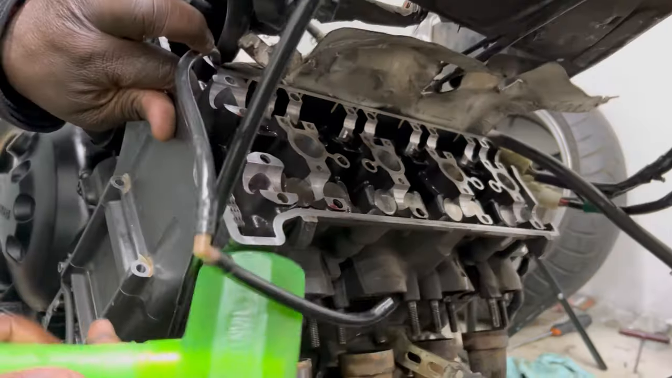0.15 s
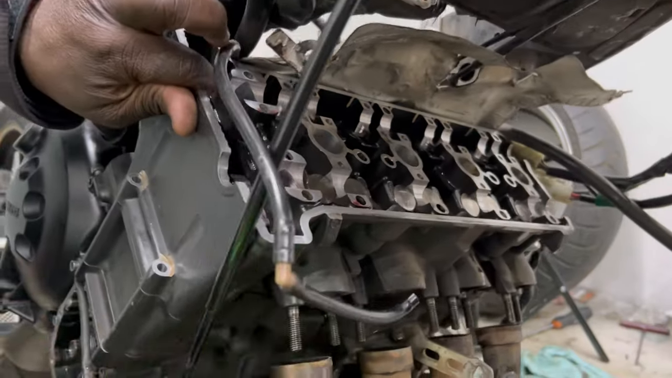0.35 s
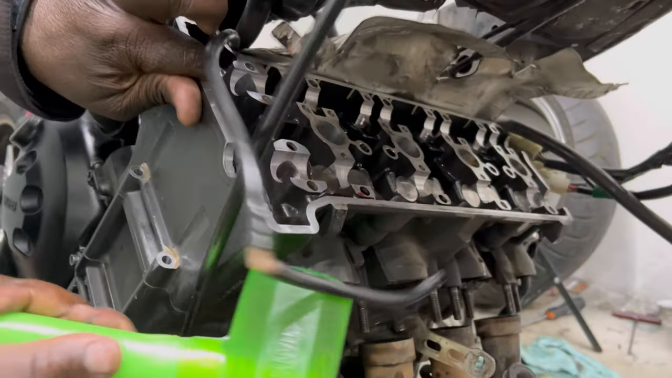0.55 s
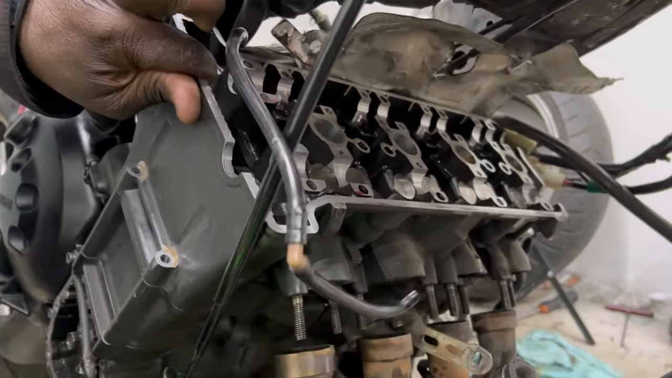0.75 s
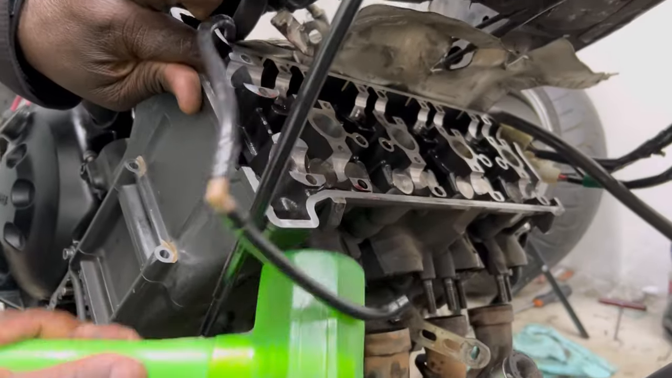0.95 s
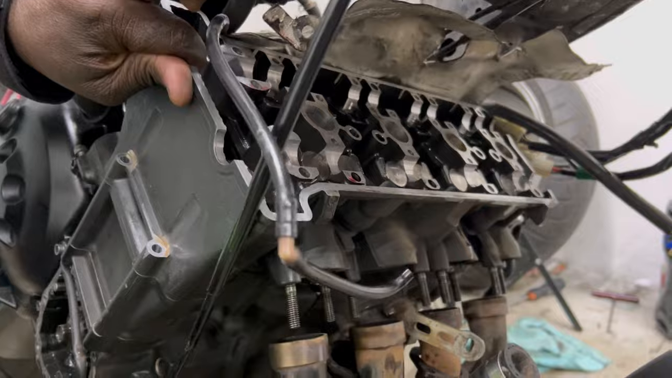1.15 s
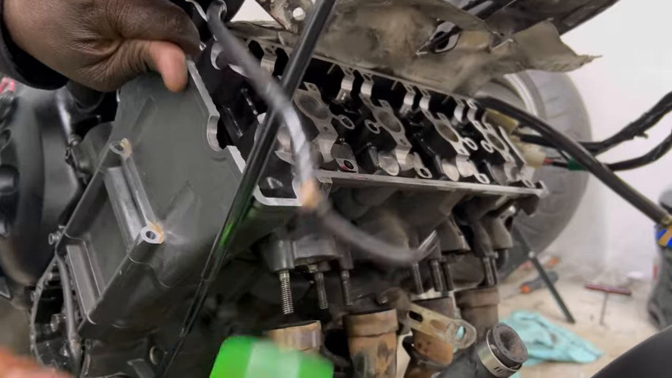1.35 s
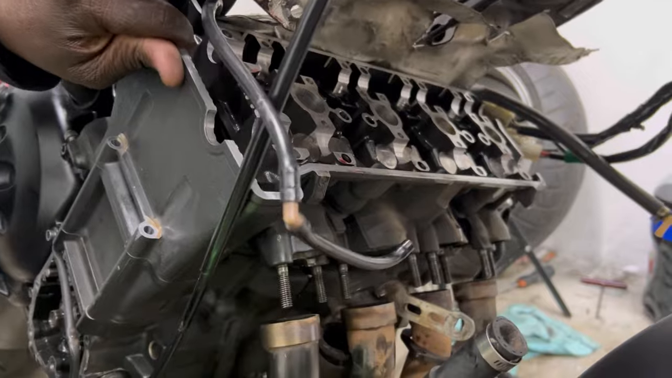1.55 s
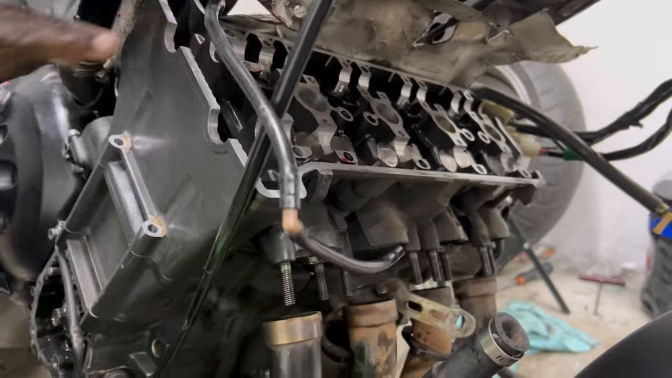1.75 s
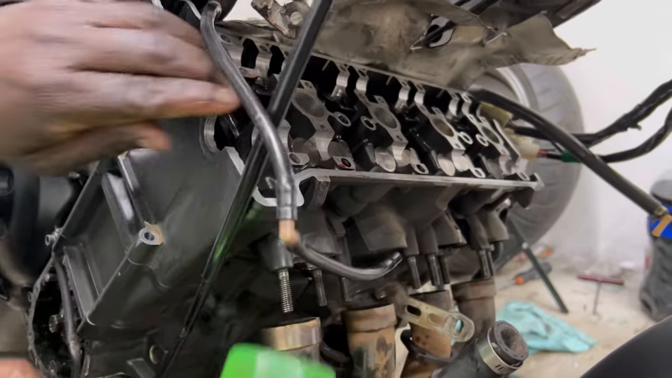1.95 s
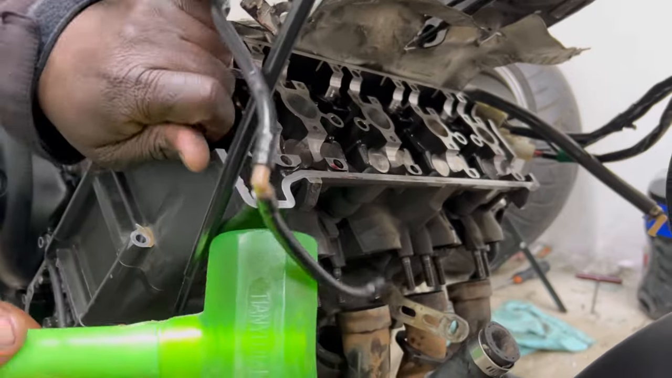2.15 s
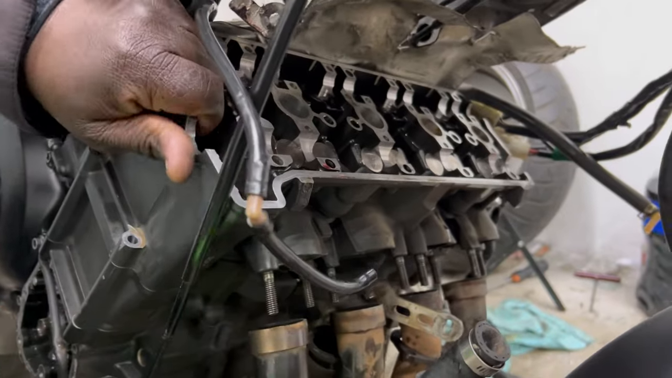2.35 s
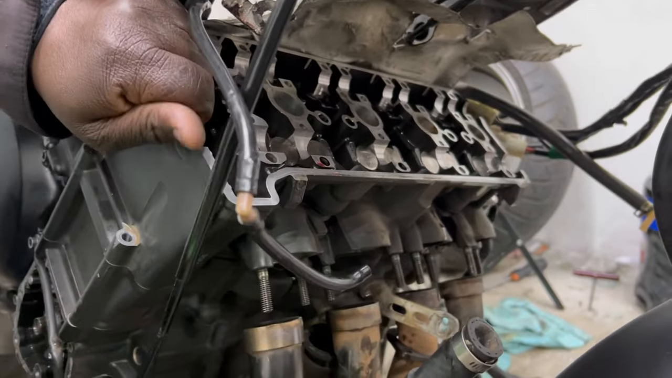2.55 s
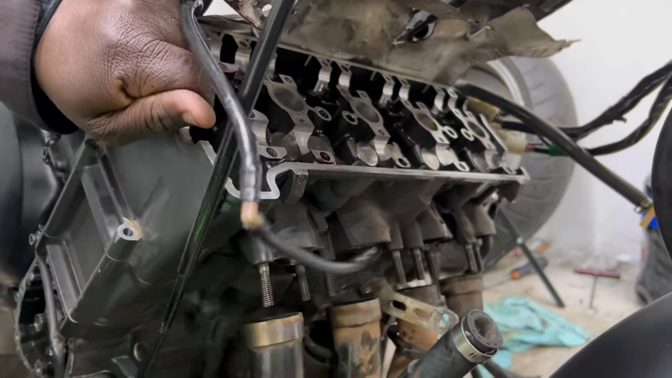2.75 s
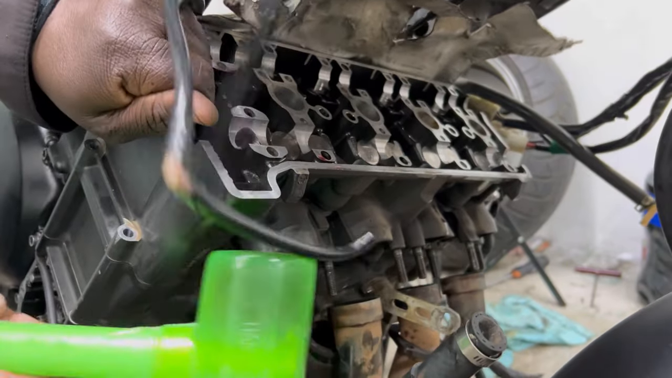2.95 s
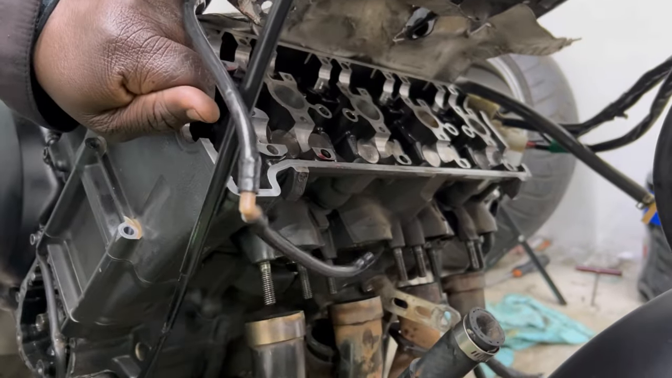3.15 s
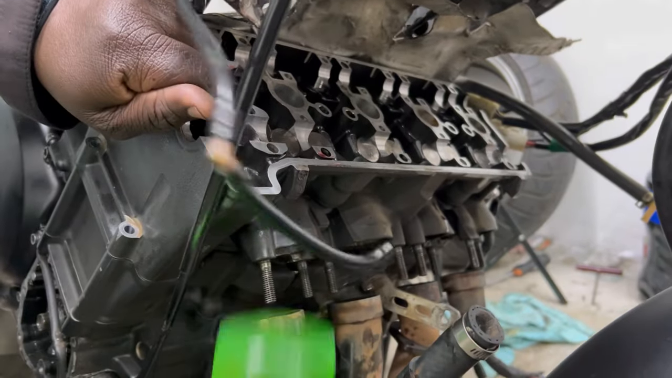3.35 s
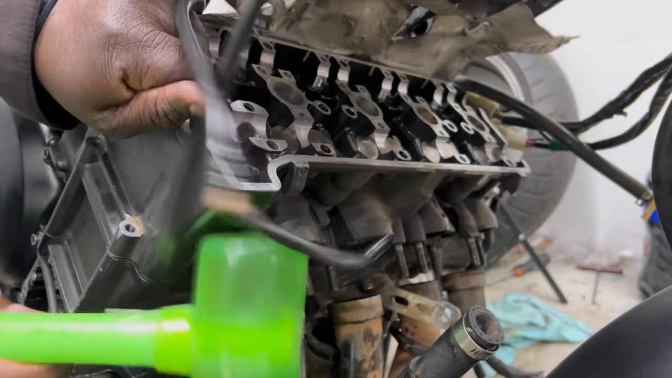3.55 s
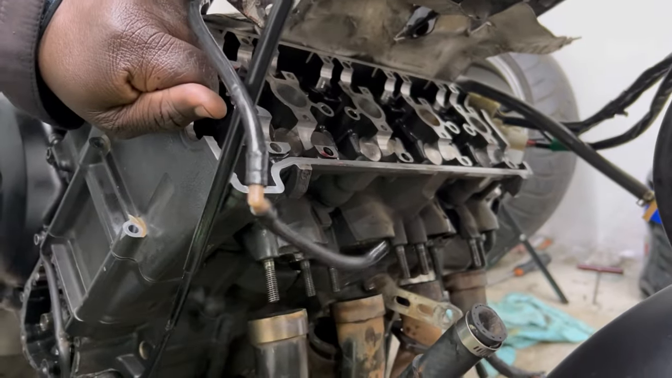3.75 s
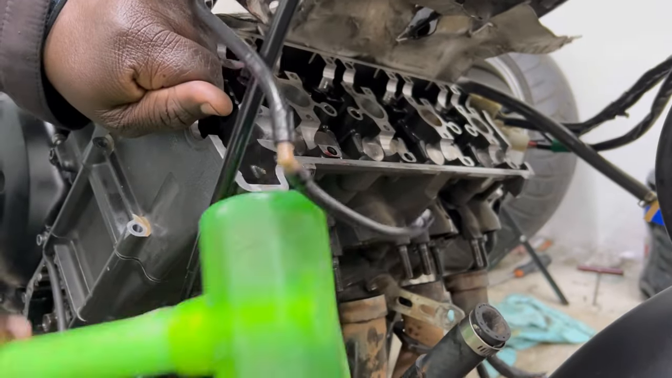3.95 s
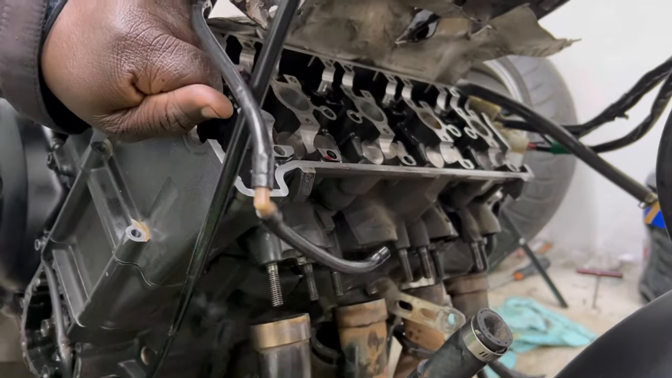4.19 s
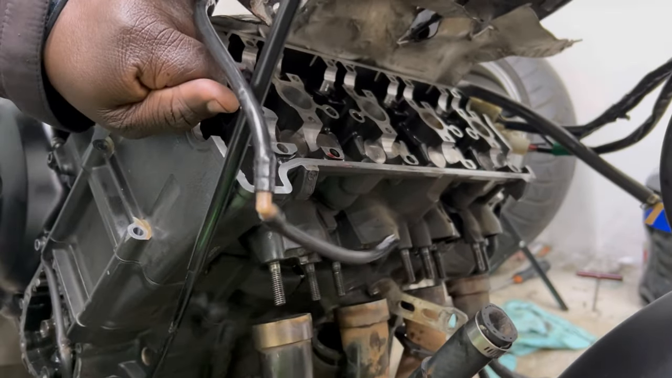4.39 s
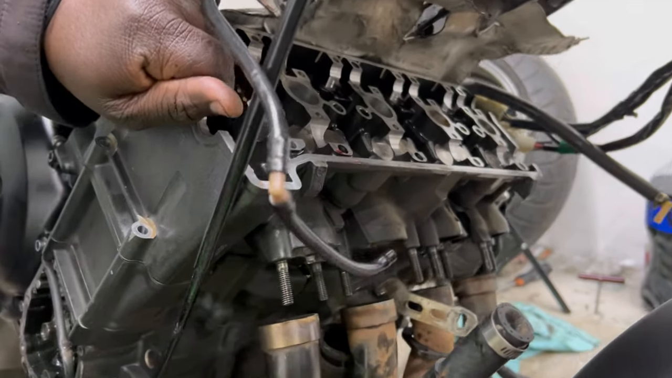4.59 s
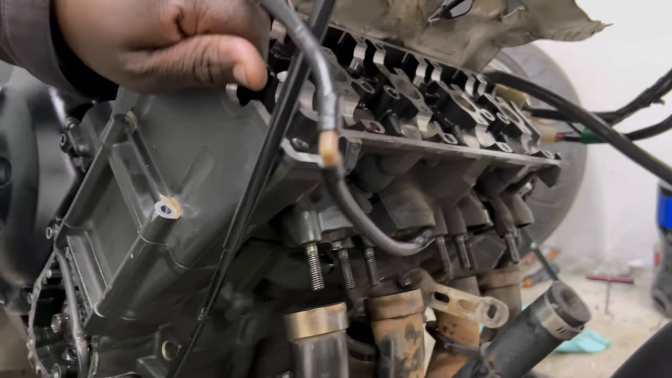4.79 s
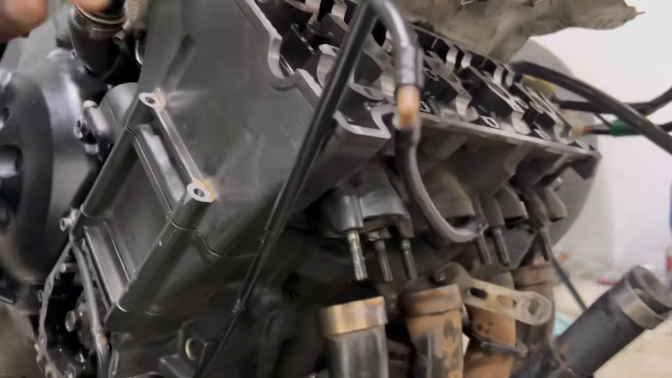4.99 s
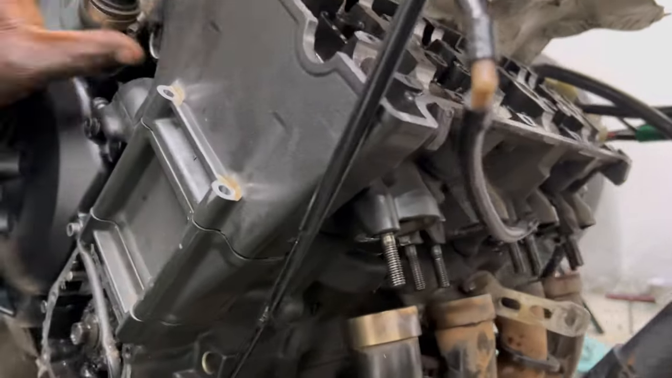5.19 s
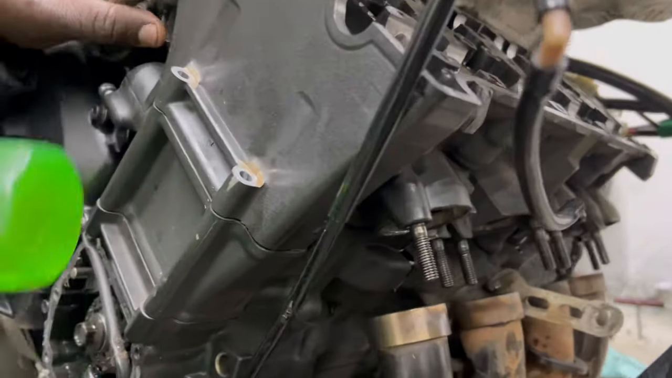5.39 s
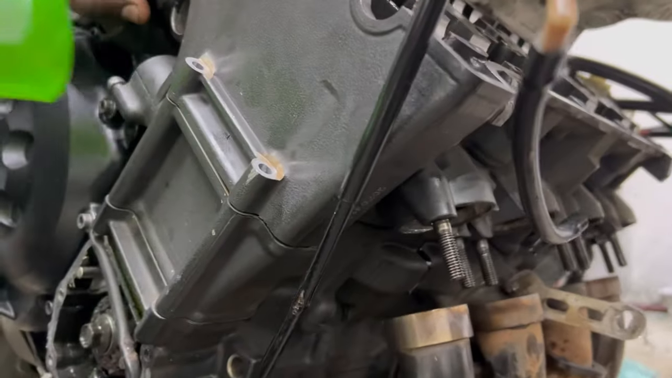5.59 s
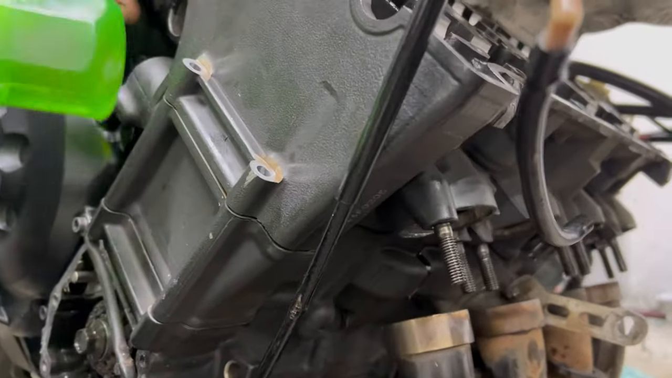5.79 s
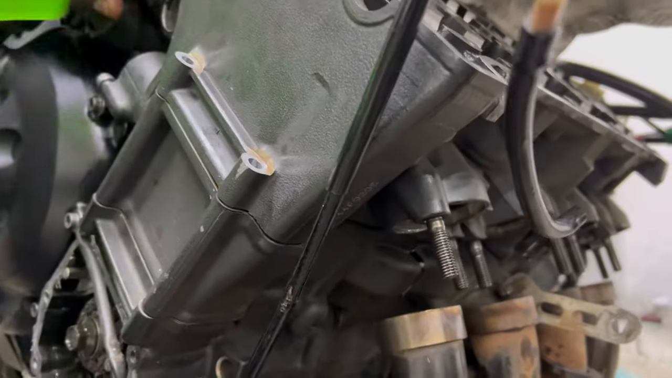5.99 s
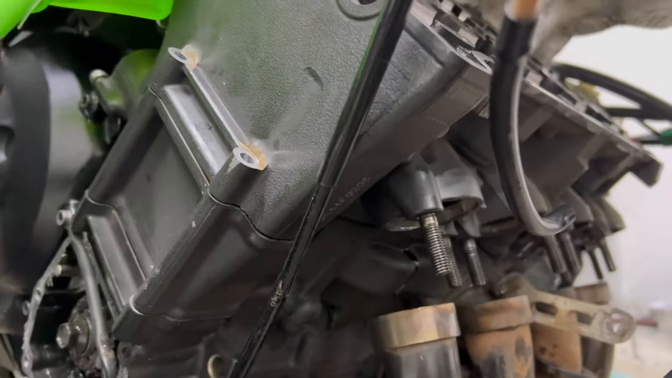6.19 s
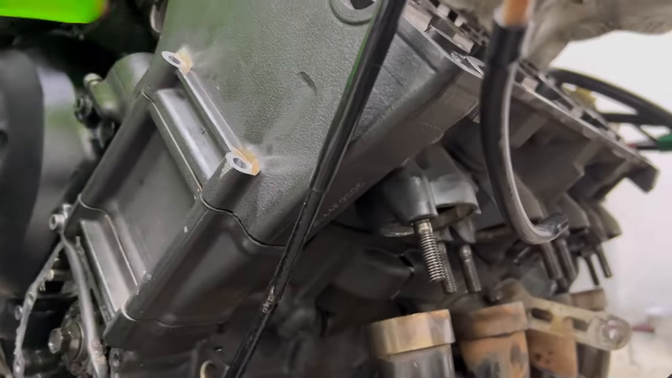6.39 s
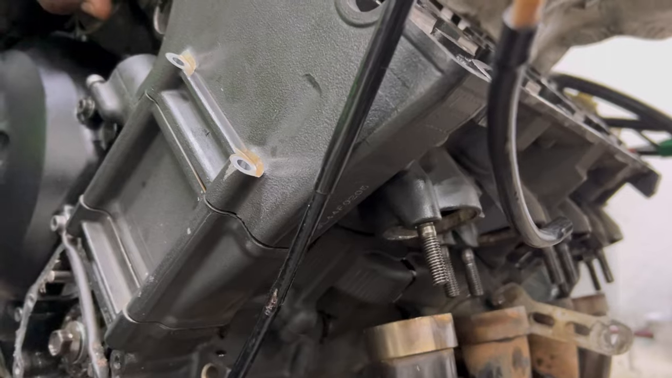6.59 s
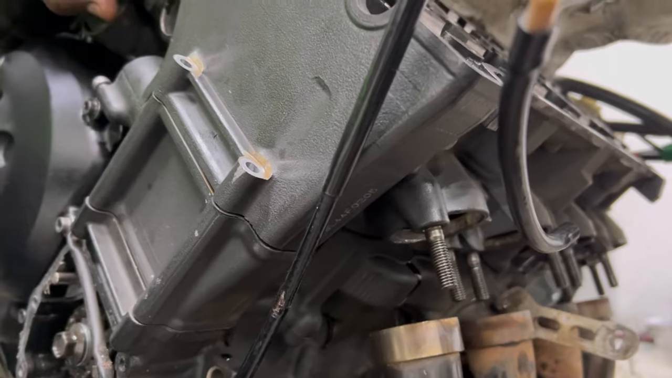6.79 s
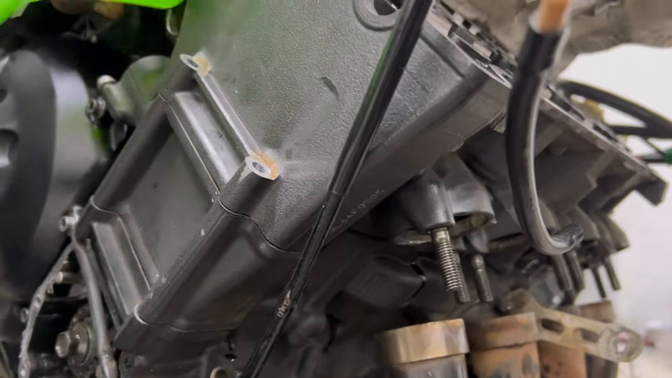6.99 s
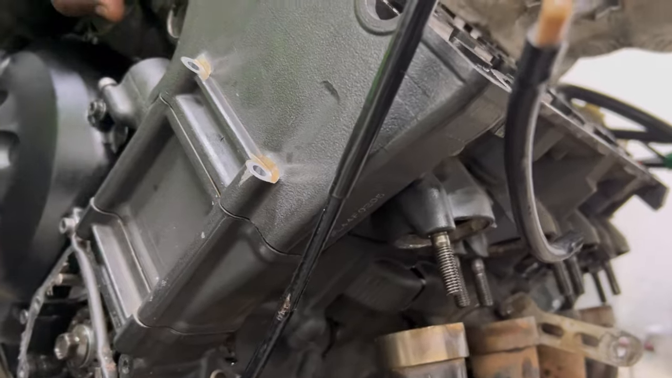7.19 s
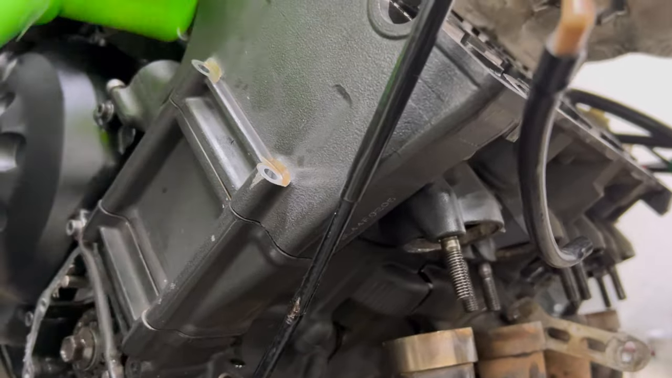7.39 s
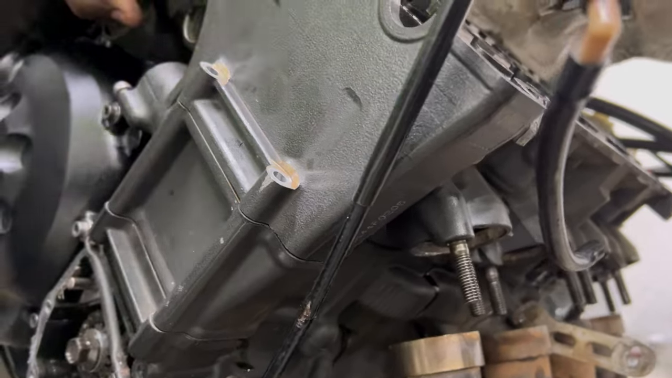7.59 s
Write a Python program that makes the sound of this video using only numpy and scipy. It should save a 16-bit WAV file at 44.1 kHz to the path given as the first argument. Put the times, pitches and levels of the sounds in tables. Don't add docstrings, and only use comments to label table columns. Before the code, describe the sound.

A soft mallet knocks a metal engine casting in two runs of hard, evenly spaced blows, then clacks sharply on a thin cover in an echoing workshop.

```python
import sys
import numpy as np
from scipy import signal
from scipy.fft import rfft, irfft
from scipy.io import wavfile
from scipy.ndimage import uniform_filter1d

SR = 44100
rng = np.random.default_rng(int(sys.argv[2]) if len(sys.argv) > 2 else 0)


def to_wav(sig):
    pcm = np.clip(np.atleast_2d(sig), -1, 1) * 32767
    pcm = np.round(pcm).astype(np.int16)
    wavfile.write(sys.argv[1], SR, pcm.T)


def convert_level_to_amplitude(level_db):
    exponent = np.asarray(level_db, float) / 20
    return 10 ** exponent


N = 336737
FFT_HZ = np.arange(1, N // 2 + 2) * SR / N

# freq_hz, density_db_per_hz
AIR_COLOUR = [(25, -6.5), (50, -1), (120, -4.5), (250, -12.5), (600, -20), (1500, -25), (7000, -34.5),
              (16000, -42.5)]
# low_hz, high_hz, usual_db, rustle_share
AIR_LAYERS = [(20, 97, -58, .1), (150, 1300, -68.5, .2), (1400, 12000, -66.5, 1)]
# time_s, rustle_db
RUSTLE = [(0.0, -56), (0.074, -47), (0.082, -68.5), (1.6, -58), (1.72, -59.5), (1.8, -67.5), (2.3, -63.5),
          (2.45, -65), (2.57, -61), (4.7, -66.5), (4.87, -62), (5.3, -66), (5.51, -61.5), (5.72, -68),
          (5.83, -76), (6.4, -80.5), (6.73, -89), (6.95, -75)]
RUSTLE_MEAN_DB = -66
# start_s, end_s, pitch_hz, level_db
DRONES = [
    (-.08, 0.073, 60.7, -35),
    (1.404, 1.698, 122, -45),
    (2.151, 2.6, 94.1, -47.5),
    (5.38, 5.46, 2151, -73),
    (5.74, 5.86, 3080, -78),
    (5.75, 6.0, 1170, -79),
    (5.757, 6.045, 580, -75),
]

SMEAR_REACH_S = 0.016
COVER_SMEAR_END_S, COVER_SMEAR_DB = 6.982, -17

# start_s, peak_db, centre_hz, t60_s
TICKS = [(.099, -22, 5000, .03), (.129, -30, 5000, 0.019), (1.37, -30.5, 5870, 0.019),
         (1.749, -36.5, 2150, 0.017), (2.022, -28.5, 4500, 0.04), (2.05, -27.5, 5400, 0.066),
         (2.719, -32, 8000, 0.014), (4.37, -38, 6060, 0.017), (4.832, -52, 600, .05),
         (4.845, -52, 2500, 0.12), (4.94, -42, 3520, 0.022), (5.181, -55, 800, 0.034),
         (5.568, -47.5, 690, 0.16), (5.597, -46, 2470, 0.053), (5.732, -51, 1100, 0.075),
         (5.51, -56, 5200, .06), (5.81, -60, 3500, .15), (6.36, -59, 2980, 0.035),
         (6.818, -66, 3010, 0.045), (7.138, -32, 5200, 0.1), (7.501, -39, 5800, 0.045)]

# start_s, force_db, hardness_db, ring_freedom_db, hiss_ahead_db
HEAD_BLOWS = [
    (0.105, -18.5, 0, 12, -30),
    (0.55, -11.5, -0.5, 8.5, -31.5),
    (0.887, -11.5, 2, 5.5, -18.5),
    (1.219, -10.5, 1, 2, -19.5),
    (2.6, -9.5, -0.5, -4, -30.5),
    (2.941, -9.5, 1.5, -7, -45.5),
    (3.252, -9, -1, -1.5, -23.5),
    (3.562, -10, 0.5, -0.5, -31),
    (3.886, -9.5, 0, -5.5, -32),
    (4.233, -9, 3, -5, -26.5),
]
# freq_hz, level_db, t60_s
HEAD_RING = [(1580, -0.5, 0.023), (1733, -4.5, .02), (2100, -2.5, 0.024), (2500, -8, 0.012),
             (1230, -11.5, 0.0071), (3200, -13.5, 0.012), (4500, -12, 0.025), (5630, -13.5, .015)]
HEAD_KNOCK = [(500, -3.5, 0.27), (732, 6, 0.063), (740, 5, 0.01), (1026, -10.5, 0.0092), (580, 10.5, 0.066),
              (355, -26.5, 0.01)]
HEAD_THUD = [(63.6, -1.5, 0.041), (91, -6.5, 0.063), (137, -3.5, 0.052), (160.6, 1, 0.088), (253, 5, 0.11),
             (283, -6, 0.098), (296, -1.5, 0.036)]
HEAD_TONE = [(1560, -3, .55), (1590, 0, .65), (1625, -2, .55), (2230, -14, .25)]
HEAD_CRACK_DB, HEAD_RING_DB, HEAD_THUD_DB, HEAD_TONE_DB = 12, 10, 3.5, -16
RING_SHARE = .5

# delay_s, level_db
ECHOES = [(.0026, -2), (.0057, -5), (.0185, -11)]
# freq_hz, t60_s, level_db
WALLS = [(56.67, 0.55, -7.5), (164, 0.57, -5.5), (410, .6, -3), (800, 0.51, -1), (1440, 0.6, -6.5),
         (4500, .47, -6.5), (8200, 0.32, -20.5), (14890, 0.39, -28)]

# freq_hz, level_db, t60_s
BRACKET_MODES = [(880, 2, 0.073), (1100, -4, 0.098), (2200, -1, 0.071), (3770, -10, .05)]
# start_s, peak_db
BRACKET_TAPS = [
    (1.949, -42),
    (1.953, -32),
    (1.957, -34),
    (2.006, -35),
    (2.024, -39),
]

# start_s, clack_db, tone_freedom_db, weight_db, contact_ms
COVER_BLOWS = [
    (2.0405, -22.5, -12, 10, .36),
    (2.053, -40.5, -9, 20, .3),
    (6.0898, -20, -4.5, -4, .46),
    (6.9843, -5.5, -9.5, -19, .12),
    (7.3626, -28, -20, 12, .6),
    (7.3799, -8, -22, 0, .24),
    (7.398, -34, 4, 12, .5),
    (7.404, -25, 6, -2, .7),
    (7.438, -32, 12, -8, .7),
    (7.472, -37, -5, 5, 0.4),
]
# freq_hz, level_db, t60_s
COVER_CLACK = [(1061, -3, 0.0079), (1610, -4.5, .012), (2170, 0.5, 0.0071), (2900, -6.5, 0.0054),
               (3700, -7, 0.0081), (4796, -11, 0.0084)]
COVER_TONE = [(1077, -0.5, 0.48), (1100, -8.5, 0.3), (1075, -13, 0.35), (1590, -5, 0.33),
              (1615, -7.5, 0.37), (2153, -9, .45), (2184, -9, .4), (2245, -9.5, 0.21), (3090, -22, 0.23),
              (3650, -11, .2)]
COVER_THUD = [(110, -14, 0.08), (212, 2.5, 0.13), (291.4, 0.5, 0.093), (405, 3.5, 0.08), (473, 6, 0.097),
              (734, 4, 0.023)]
COVER_CRACK_DB, CRACK_LOSS_DB_PER_MS = -3, 4
THUD_CONTACTS = 6

# freq_hz, level_db, t60_s
STAND_MODES = [(203, 0, .16), (228, -7, .12), (125, -18, .1)]
# start_s, peak_db
STAND_JOLTS = [
    (7.365, -20),
    (7.381, -16.5),
    (7.404, -16),
]

# freq_hz, likeness_0_to_1
LIKENESS = [(100, .97), (250, .85), (500, .4), (1000, .15), (6000, .15)]
# freq_hz, left_minus_right_db
PORT_TILT = [(60, -0.5), (200, -1), (380, -2), (1290, -1.5), (2380, 3.5), (4400, -10), (8120, -8),
             (15000, -1)]
TREBLE_HZ, TREBLE_LAG_S, LEFT_LAG_S, TOP_HZ = 7200, 1 / 4800, .00008, 15900


def on_log(rows, col=1, hz=FFT_HZ):
    rows = np.array(rows, float)
    return np.interp(np.log(hz), np.log(rows[:, 0] + 1), rows[:, col])


def band(x, lo_hz, hi_hz):
    sos = signal.butter(2, [lo_hz, min(hi_hz, .45 * SR)], "band", fs=SR, output="sos")
    return signal.sosfilt(sos, x)


def settle(x, drain_s):
    keep = np.exp(-1 / (drain_s * SR))
    return signal.lfilter([1 - keep], [1, -keep], x)


def add(out, x, start_s, level_db):
    i = int(start_s * SR)
    out[i:i + len(x)] += convert_level_to_amplitude(level_db) * x[:len(out) - i]


def burst(lo_hz, hi_hz, t60_s):
    t = np.arange(SR // 4) / SR
    noise = band(rng.standard_normal(len(t)), lo_hz, hi_hz)
    return noise * convert_level_to_amplitude(-60 * t / t60_s) * np.sqrt(SR / (8 * (hi_hz - lo_hz)))


def ring(modes, push_s, scatter_db=2.0, detune=0.0061):
    hz, level_db, t60_s = np.transpose(modes)[:, :, None]
    t = np.arange(int(t60_s.max() * SR) + 400) / SR
    chance = rng.standard_normal((2, len(modes), 1))
    decay = convert_level_to_amplitude(level_db + scatter_db * chance[0]) * convert_level_to_amplitude(-60 * t / t60_s)
    free = decay * np.sin(2 * np.pi * hz * (1 + detune * chance[1]) * t)
    push = np.sin(np.pi * np.clip(t[:400] / push_s, 0, 1))
    out = signal.fftconvolve(free.sum(axis=0), push)[:len(t)]
    return out / np.abs(out).max()


def blows(levels, modes, detune, lag_s, top_hz):
    out = np.zeros((2, N))
    for start_s, crack_db, parts_db, pushes_s in levels:
        add(out[0], burst(3000, top_hz, .008), start_s - .0003, crack_db)
        for k in range(3):
            row = int(modes[k] is COVER_TONE)
            part = ring(modes[k], pushes_s[k], detune=detune[k])
            add(out[row], part, start_s + lag_s + pushes_s[k], parts_db[k])
    return out


def taps(modes, events, push_s):
    out = np.zeros(N)
    for start_s, peak_db in events:
        add(out, ring(modes, push_s), start_s, peak_db)
    return out


def air():
    t, out = np.arange(N) / SR, 0
    rustle_db = np.interp(t, *np.transpose(RUSTLE)) - RUSTLE_MEAN_DB
    colour = irfft(rfft(rng.standard_normal((2, N))) * convert_level_to_amplitude(on_log(AIR_COLOUR)), N)
    for k, (lo_hz, hi_hz, usual_db, share) in enumerate(AIR_LAYERS):
        layer = band((-1) ** k * colour, lo_hz, hi_hz)
        steps = np.repeat(rng.standard_normal(N // 2000 + 1), 2000)[:N]
        wander_db = 1.1 * uniform_filter1d(steps, size=2000)
        out = out + layer / layer.std() * convert_level_to_amplitude(usual_db + share * rustle_db + wander_db)
    for start_s, end_s, hz, level_db in DRONES:
        swell = np.sin(np.pi * np.clip((t - start_s) / (end_s - start_s), 0, 1)) ** .5
        out[0] += convert_level_to_amplitude(level_db) * swell * np.sin(2 * np.pi * hz * t)
    return out


def smears():
    out = np.zeros(N)
    ends = [(start_s - .001, hiss_db) for start_s, _, _, _, hiss_db in HEAD_BLOWS]
    for end_s, level_db in ends + [(COVER_SMEAR_END_S, COVER_SMEAR_DB)]:
        rising = burst(800, 7000, 2 * SMEAR_REACH_S)[SR // 20::-1]
        add(out, rising, end_s - 1 / 20, level_db)
    return out


def ticks():
    out = np.zeros(N)
    for start_s, peak_db, hz, t60_s in TICKS:
        add(out, burst(hz / 1.6, hz * 1.6, max(t60_s, .005)), start_s, peak_db)
    return out


def head_blows():
    levels = []
    for start_s, force_db, hard_db, free_db, _ in HEAD_BLOWS:
        ring_db = force_db + RING_SHARE * free_db + HEAD_RING_DB
        parts_db = [ring_db, force_db + 4.5, force_db + HEAD_THUD_DB]
        levels.append((start_s, force_db + hard_db + HEAD_CRACK_DB, parts_db, [.00025, .0006, .002]))
    return blows(levels, [HEAD_RING, HEAD_KNOCK, HEAD_THUD], [.008, .02, .02], lag_s=.001, top_hz=15500)[0]


def nearby(x):
    out, dull = np.zeros(N), band(x, 200, 6000)
    for delay_s, level_db in ECHOES:
        add(out, dull, delay_s, level_db)
    return out


def workshop(x, wet_db=2):
    noise, tail = rng.standard_normal((2, N)), 0
    late = np.r_[np.zeros(SR // 125), x][:N]
    for k, hz in enumerate(56 * 1.5 ** np.arange(15)):
        struck = settle(band(late, hz / 1.4, hz * 1.4) ** 2, .003 + 1 / hz)
        energy = settle(struck, on_log(WALLS, hz=hz) / np.log(10 ** 6))
        hiss = (-1) ** k * band(noise, hz / 1.225, min(hz * 1.225, TOP_HZ))
        gain = convert_level_to_amplitude(wet_db + on_log(WALLS, col=2, hz=hz))
        tail = tail + gain * np.sqrt(energy) * hiss / hiss.std()
    return tail


def head_tone():
    out = np.zeros(N)
    for start_s, force_db, _, free_db, _ in HEAD_BLOWS:
        tone = ring(HEAD_TONE, 0.00035, detune=0.0056)
        add(out, tone, start_s + 0.011, force_db + free_db + HEAD_TONE_DB)
    return out


def bracket():
    return taps(BRACKET_MODES, BRACKET_TAPS, push_s=0.00021)


def cover_blows():
    levels = []
    for start_s, clack_db, free_db, weight_db, contact_ms in COVER_BLOWS:
        crack_db = clack_db + COVER_CRACK_DB - CRACK_LOSS_DB_PER_MS * contact_ms
        parts_db = [clack_db + 8, clack_db + free_db + 4, clack_db + weight_db]
        pushes_s = np.array([.5, 1, THUD_CONTACTS]) * contact_ms / 1000
        levels.append((start_s, crack_db, parts_db, pushes_s))
    modes = [COVER_CLACK, COVER_TONE, COVER_THUD]
    return blows(levels, modes, [.02, .001, .02], lag_s=0.00023, top_hz=12000)


def stand():
    return taps(STAND_MODES, STAND_JOLTS, push_s=.003)


def ports(direct, diffuse):
    like = on_log(LIKENESS)
    near, lag = rfft(direct), np.exp(-1j * np.pi * FFT_HZ * LEFT_LAG_S)
    mid = rfft(diffuse[0]) * np.sqrt((1 + like) / 2)
    side = rfft(diffuse[1]) * np.sqrt((1 - like) / 2)
    share = np.clip((FFT_HZ - TREBLE_HZ) / 1200 + .5, 0, 1)
    treble = rfft(direct + diffuse[0]) * np.sin(share * np.pi / 2)
    rest, tilt = np.cos(share * np.pi / 2), convert_level_to_amplitude(on_log(PORT_TILT) / 2)
    left = (near * lag + mid + side) * rest * tilt + treble
    late_treble = treble * np.exp(-2j * np.pi * FFT_HZ * TREBLE_LAG_S)
    right = (near / lag + mid - side) * rest / tilt - late_treble
    return irfft([left, right], N)


def scene():
    head = head_blows()
    cover, tone = cover_blows()
    cover = cover + ticks() + bracket() + stand()
    head, cover = band(np.array([head, cover]), 75, 19000)
    direct = head + nearby(head + convert_level_to_amplitude(-8) * cover) + head_tone() + cover + tone
    diffuse = workshop(head + convert_level_to_amplitude(-7.0) * cover) + air() + smears()
    return ports(direct, diffuse)


def top_cut(x):
    return signal.sosfilt(signal.butter(12, 17310, fs=SR, output="sos"), x)


def record(dry):
    thin = signal.sosfilt(signal.butter(2, 32, "high", fs=SR, output="sos"), dry)
    dull = signal.sosfilt(signal.butter(14, TOP_HZ, fs=SR, output="sos"), thin)
    return top_cut(0.88 * np.tanh(dull / 1.042))


dry = scene()
out = record(dry)
to_wav(out)
```